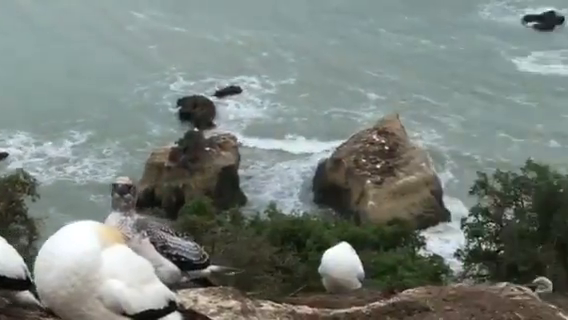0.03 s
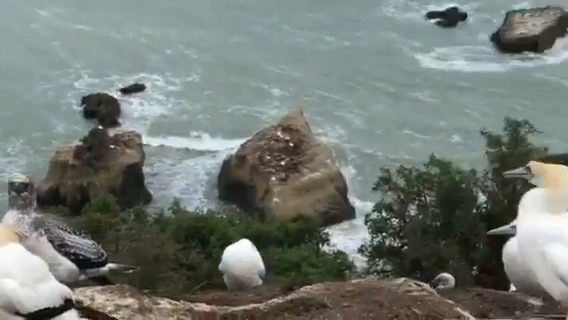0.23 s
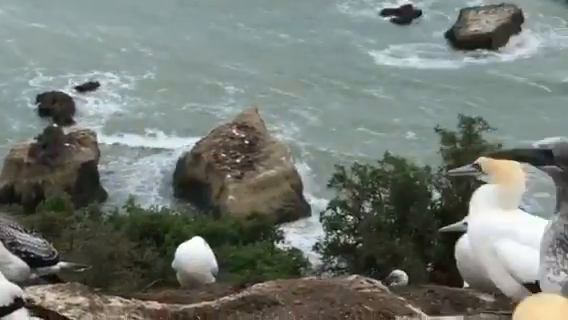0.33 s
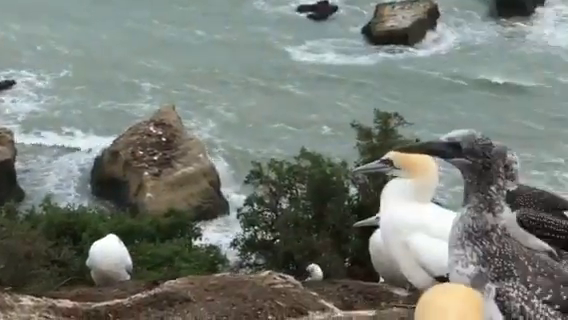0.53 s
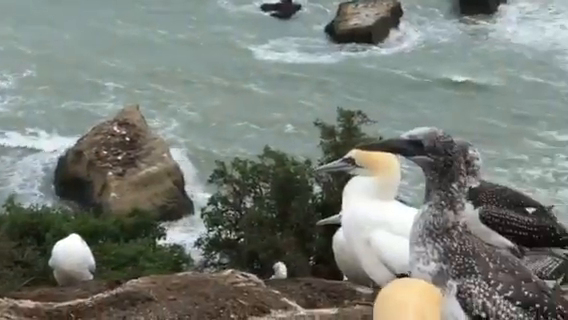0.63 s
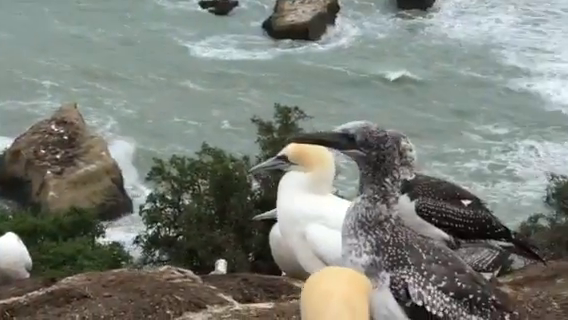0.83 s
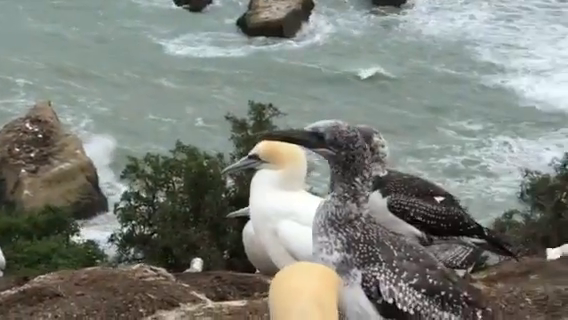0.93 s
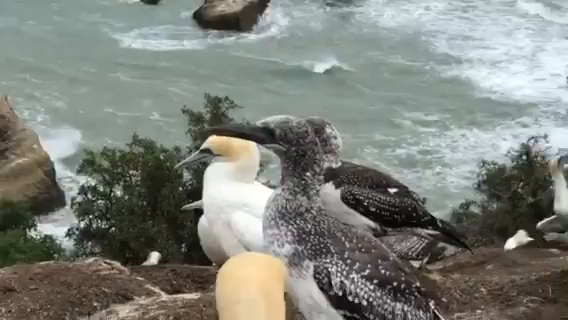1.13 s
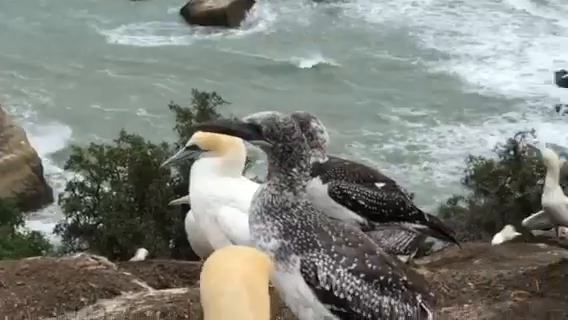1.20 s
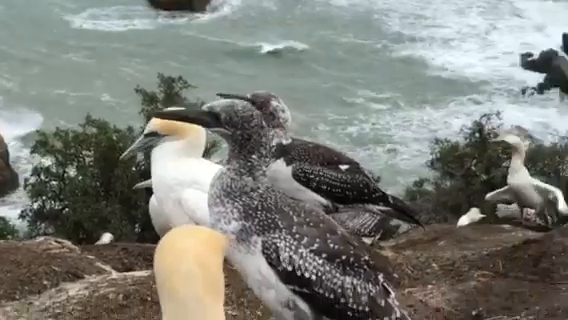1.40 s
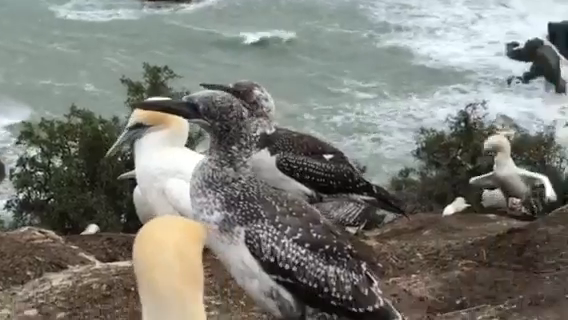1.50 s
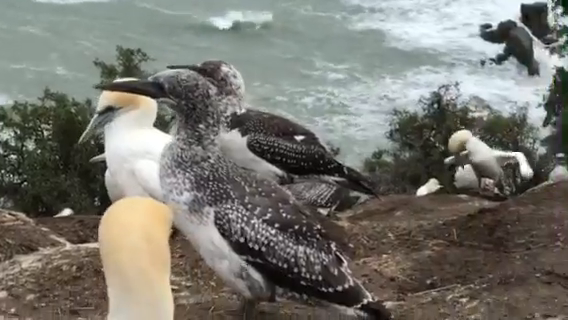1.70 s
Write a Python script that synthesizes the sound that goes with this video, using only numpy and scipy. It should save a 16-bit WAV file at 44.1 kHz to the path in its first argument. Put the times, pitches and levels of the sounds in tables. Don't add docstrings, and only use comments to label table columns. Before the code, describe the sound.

Seabirds cackle in quick rasping, ringing notes at the start, around 0.6 and again at 1.1 seconds. A chick's thin peeps repeat every 0.18 seconds, fainter near 0.9. A short deep call comes at 0.2, nasal honks at 0.45, 1.0, 1.3 and 1.6. Bills scrape and tick faintly. Wind rumbles and pops hard at 0.67 and 1.05-1.25, over steady distant surf and colony murmur.

```python
import sys
import numpy as np
from scipy import signal
from scipy.io import wavfile
from scipy.ndimage import uniform_filter1d

SR = 44100
rng = np.random.default_rng(int(sys.argv[2]) if len(sys.argv) > 2 else 0)


def int16_out(signal):
    q = np.round(np.clip(np.atleast_2d(signal).T, -1, 1) * 32767)
    wavfile.write(sys.argv[1], SR, q.astype(np.int16))


def volts_from_db(level):
    exponent = np.asarray(level, float) / 20
    return 10 ** exponent


N = 77175

# start t/s, top pitch f/Hz, level/dB
CHICK_PEEPS = [
    (.032, 2267, -44),
    (0.204, 2253, -43),
    (0.381, 2233, -45),
    (.563, 2235, -45.5),
    (.739, 2203, -48.5),
    (.920, 2206, -50.5),
    (1.096, 2216, -46.5),
    (1.276, 2216, -43.5),
    (1.455, 2244, -45.5),
    (1.641, 2240, -43.5),
]
PEEP_HARMONICS = [0, -17, -44, -46, -43, -42, -43]
# start t/s, length t/s, ring f/Hz, level/dB, octave level/dB
CACKLE_NOTES = [(.028, 0.022, 1925, -35.5, -21), (0.088, 0.026, 1875, -40.5, -14),
                (0.156, 0.032, 1815, -33.5, -20), (.563, 0.019, 1734, -36, -13.5),
                (0.636, 0.016, 1800, -46.5, 6), (.618, .02, 2200, -50, -12), (0.706, 0.024, 1785, -40, -5),
                (1.096, 0.023, 1940, -36.5, -17), (1.158, 0.032, 1890, -37.5, -19),
                (1.226, 0.028, 2000, -47, -14), (0.096, 0.0194, 1476, -41, -15),
                (0.4, 0.015, 1500, -42.5, -7), (.035, 0.0073, 1544, -37.5, -22),
                (1.575, 0.027, 1556, -37, -4.5), (1.592, 0.019, 2900, -48, -21),
                (0.381, 0.025, 1500, -49.5, -16), (1.279, 0.012, 1400, -43, -30)]
# start t/s, level/dB
CACKLE_RASPS = [(.003, -43), (0.067, -39), (0.138, -41), (0.538, -46), (0.607, -55), (.68, -52.5),
                (1.072, -44.5), (1.142, -45.5), (1.205, -48), (1, -50.5), (1.66, -42.5), (1.678, -48),
                (0.18, -51), (.03, -53), (0.33, -53.5), (.63, -53), (0.45, -52), (1.03, -54), (1.49, -50),
                (0.86, -55.5), (1.2, -52.5), (.21, -42), (.245, -47)]
# f/Hz, width f/Hz, level/dB
THROAT = [(1500, 450, 0), (2000, 500, -2), (3300, 900, -8), (4900, 1200, -17)]
# start t/s, length t/s, first pitch f/Hz, last pitch f/Hz, level/dB
NASAL_HONKS = [
    (0.450, 0.057, 969.6, 989, -39.5),
]
# f/Hz, level/dB
NASAL_BILL = [(950, -9), (1900, 2.5), (2900, -12), (3900, -1), (4900, -16), (9800, -23), (10800, -40),
              (12800, -27)]
# start t/s, length t/s, first pitch f/Hz, last pitch f/Hz, level/dB
DEEP_CALLS = [
    (0.201, 0.038, 478.8, 472.8, -32.5),
]
# f/Hz, level/dB
DEEP_COLOUR = [(950, -16.5), (1450, 1.5), (1900, -10), (2400, -20), (2900, -12.5), (4100, -29.5),
               (5500, -20.5), (12000, -56)]
# start t/s, length t/s, first pitch f/Hz, last pitch f/Hz, level/dB
NEIGHBOUR_HONKS = [
    (0.232, 0.0438, 926, 847, -43.5),
    (1.276, .060, 922, 843.6, -42),
]
# f/Hz, level/dB
NEIGHBOUR_BILL = [(880, -7), (1760, 2), (2650, -4), (3550, -5), (4400, -25), (5800, -13), (8800, -35),
                  (11500, -27)]
# start t/s, length t/s, first pitch f/Hz, last pitch f/Hz, level/dB
DISTANT_HONKS = [
    (0.745, .043, 1084, 1018, -46.5),
    (0.99, 0.056, 1021, 956, -45),
    (1.594, 0.026, 1070, 1010, -43.5),
    (1.66, 0.022, 1093, 1125, -50),
    (.886, 0.018, 844, 810, -55),
]
# f/Hz, level/dB
DISTANT_BILL = [(1000, -5), (2000, 0), (3000, -5), (4000, -8), (5000, -26), (6200, -19), (8500, -22),
                (13000, -38)]
# start t/s, length t/s, level/dB
BILL_SCRAPES = [(.008, 0.024, -66), (.03, .025, -58), (0.071, 0.023, -54.5), (0.091, 0.024, -52),
                (0.137, 0.017, -59), (.158, 0.032, -59), (0.21, 0.031, -52), (0.263, 0.015, -58),
                (0.419, 0.014, -60), (0.492, 0.02, -56), (0.54, 0.02, -58.5), (0.599, 0.049, -65),
                (.955, .016, -63), (1.125, .02, -63), (1.675, 0.01, -67), (1.49, 0.014, -67),
                (1.582, .02, -62)]
# f/Hz, width f/Hz, level/dB
SCRAPE_HISS = [(5050, 2000, 0), (6570, 1800, -2), (8300, 1600, -10.5), (12500, 3000, -23)]
# middle t/s, level/dB
BILL_TICKS = [(0.0781, -55), (.2191, -60), (0.4251, -70), (0.5211, -70), (0.6361, -65), (.7381, -71),
              (.5051, -68), (.2851, -73), (.2951, -73), (1.2111, -73), (1.1401, -73), (1.2501, -75),
              (.2321, -66), (.1081, -68), (1.537, -75), (1.67, -70)]
# t/s, level/dB
GUST_STRENGTH = [(0, -38), (.17, -36), (.25, -28.5), (.36, -27.5), (.62, -24.5), (0.691, -29.5),
                 (0.792, -33), (0.881, -28.5), (0.941, -32.5), (1.06, -23), (1.11, -25), (1.219, -22.5),
                 (1.29, -37), (1.37, -27.5), (1.54, -34), (1.6, -36.5), (1.75, -37)]
# f/Hz, level/dB
WIND_RUMBLE = [(25, -22), (40, -4), (58, 8), (100, -6), (170, -7), (300, -22.5), (600, -32), (1500, -78.5)]
# start t/s, peak level/dB, upper edge f/Hz, length t/s
WIND_BUFFETS = [(.197, -31, 220, 0.025), (.282, -25, 186, 0.01), (.434, -26, 199, 0.036),
                (0.514, -23, 420, 0.033), (.56, -27.5, 300, .03), (.628, -24.5, 325, .035),
                (.75, -31, 200, 0.031), (1.23, -23, 200, 0.013), (1.01, -27, 301, .02),
                (.355, -27, 181, 0.019), (.602, -22.5, 253, .02), (.662, -15, 300, 0.028),
                (0.689, -14.5, 330, 0.018), (0.712, -20, 374, .02), (.808, -26.5, 297, 0.016),
                (1.051, -11, 248, 0.019), (1.063, -18.5, 178, 0.02), (1.122, -20, 200, 0.01),
                (1.199, -17, 375, 0.014), (1.219, -18, 328, 0.02), (1.351, -18.5, 281, 0.037),
                (1.394, -19.5, 386, 0.015), (1.51, -21.5, 189, 0.024)]
# middle t/s, peak level/dB, centre f/Hz
WIND_POPS = [(.6717, -3, 150), (.679, -13.5, 172), (.686, -12.5, 98), (.695, -18.5, 890), (1.016, -19, 220),
             (1.187, -18, 553), (1.224, -23, 554), (1.475, -22.5, 250), (.886, -19, 170), (1.55, -23.5, 57),
             (.705, -15.5, 120), (.862, -22, 55), (.9, -21, 50), (.7, -15, 45), (.34, -24, 55),
             (.755, -26, 60), (1.11, -21, 60), (1.44, -27, 65), (.97, -26, 55), (.5, -26, 90),
             (1.7, -32, 55), (1.238, -15, 140), (1.398, -24, 500), (.522, -22, 450), (.365, -23, 110)]
# t/s, level/dB
SURF_SWELL = [(0, 5), (.3, 2), (.6, 5), (.8, 2), (1.1, 4), (1.4, 3), (1.75, 6.5)]
# f/Hz, level/dB
SURF_COLOUR = [(220, -5.5), (600, -14), (1200, -16), (2000, -20.5), (3800, -26.5), (7500, -41),
               (10500, -54), (15500, -59.5)]

EDGE_S = 0.00589


def peep(start, top_hz, db):
    length_s, top_at = 0.047, 0.38
    u, env = shape(length_s)
    rising = 0.035 * (1 - u / top_at) ** 2
    falling = 0.095 * ((u - top_at) / (1 - top_at)) ** 2
    bend = np.where(u < top_at, rising, falling)
    blip_u, blip_env = shape(0.011)
    blip_wobble, wobble = uniform_filter1d(rng.standard_normal((2, 4000)), size=150, axis=1)
    blip_pitch = 1638 * (1 + 0.0078 * evened(blip_wobble)[:len(blip_u)])
    blip = volts_from_db(db - 2) * blip_env * stack(blip_pitch, [2.5, 0.5])
    dulling = 4 * np.c_[:len(PEEP_HARMONICS)] * (u ** 2 - 0.2)
    pitch = top_hz * (1 - bend + 0.003 * evened(wobble)[:len(u)])
    whistle = volts_from_db(db) * env * stack(pitch, np.c_[PEEP_HARMONICS] - dulling)
    return [(start, whistle), (start + length_s - 0.002, blip)]


def note(start, length, hz, db, octave_db):
    u, env = shape(length)
    wobble = evened(smooth_twice(rng.standard_normal(4000), 90, 60))[:len(u)]
    pitch = hz * (1 + 0.035 * (0.5 - u) + 0.012 * wobble)
    ring = stack(pitch, [0, octave_db - 30 * (u - 0.65) ** 2])
    return start, volts_from_db(db) * env * np.sin(np.pi * u) * ring


def rasp(throat, start, length, db):
    pulse_hz, roughness = 430, 0.7
    u, env = shape(length)
    drift, breath = rng.standard_normal((2, 4000))[:, :len(u)]
    turns = np.cumsum(pulse_hz * (1 + 2 * uniform_filter1d(drift, size=100))) / SR
    gate = np.exp(-(turns % 1) / 0.15)
    pulses = evened(np.diff(gate, prepend=1))
    puffs = evened((gate + 0.3) * breath)
    drive = (1 - roughness) * pulses + roughness * puffs
    drive = signal.sosfilt(signal.butter(2, 9000, fs=SR, output="sos"), drive)
    voice = 0
    for hz, width, gain_db in throat:
        voice = voice + volts_from_db(gain_db) * resonate(resonate(drive, hz, width), hz, width)
    unsteady_db = 3.0 * evened(smooth_twice(drift[::-1], 120, 50))
    return start, volts_from_db(db) * env * evened(voice * volts_from_db(unsteady_db))


def honk(bill, start, length, first_hz, last_hz, db):
    u, env = shape(length)
    mean_hz = (first_hz + last_hz) / 2
    hz = mean_hz * np.arange(1, int(31000 / (first_hz + last_hz)) + 1)
    faintness_db = max(-39.5 - db, 0)
    distance = 0.3 * (hz == hz[0]) - 0.3556 * (hz / 1000 - 2)
    levels = read(bill, hz) + distance * faintness_db
    levels = levels - 6 * np.maximum(hz - 13200, 0) / 1000
    peak_at = 0.62 if last_hz > first_hz else 0.48
    swell = -13 * np.maximum(hz / 1000 - 2, 0)[:, None] * (u - peak_at) ** 2
    chance = smooth_twice(rng.standard_normal((40, 4000)), 300, 100)
    flutter = 3.2 * evened(chance)[:len(hz), 500:500 + len(u)] * (hz[:, None] > 2200)
    glide = first_hz + (last_hz - first_hz) * u
    pitch = glide * (1 + 0.0015 * evened(chance[-1])[:len(u)])
    air = evened(smooth_twice(rng.standard_normal(4000), 120, 120))[:len(u)]
    hoarse = 1 + volts_from_db(-17) * air
    return start, volts_from_db(db) * env * hoarse * stack(pitch, levels[:, None] + swell + flutter)


def birds():
    calls = []
    for row in CHICK_PEEPS:
        calls += peep(*row)
    calls += [note(*row) for row in CACKLE_NOTES]
    calls += [rasp(THROAT, start, 0.025, db) for start, db in CACKLE_RASPS]
    for bill, honks in [(NASAL_BILL, NASAL_HONKS), (DEEP_COLOUR, DEEP_CALLS),
                        (NEIGHBOUR_BILL, NEIGHBOUR_HONKS), (DISTANT_BILL, DISTANT_HONKS)]:
        calls += [honk(bill, *row) for row in honks]
    calls += [rasp(SCRAPE_HISS, *row) for row in BILL_SCRAPES]
    mix = np.zeros(N)
    for start, sound in calls:
        add(mix, start, sound)
    echo_db, echo_s = -17.5, 0.24
    t = np.arange(SR // 4) / SR
    tail = rng.standard_normal(len(t)) * volts_from_db(-60 * t / echo_s) * (t > 0.004)
    return mix + volts_from_db(echo_db) * signal.fftconvolve(mix, tail / np.linalg.norm(tail))[:N]


def ticks():
    mix, t = np.zeros(N), np.arange(260) / SR
    env = np.sin(np.pi * t / t[-1]) ** 2
    for moment, db in BILL_TICKS:
        bright = np.diff(rng.standard_normal(len(t) + 1))
        add(mix, moment - t[-1] / 2, volts_from_db(db) * env * evened(bright))
    return mix


def wind():
    lumps = evened(uniform_filter1d(rng.standard_normal(N // 256 + 5), size=4))
    gust_db = np.interp(np.arange(N) / SR, *np.transpose(GUST_STRENGTH)) + 0.5
    mix = noise(WIND_RUMBLE, 1024, 3.0 * lumps[None]) * volts_from_db(gust_db)
    for moment, db, edge_hz, length in WIND_BUFFETS:
        band = signal.butter(2, [0.3 * edge_hz, edge_hz], "bandpass", fs=SR, output="sos")
        push = signal.sosfilt(band, rng.standard_normal(6000))
        push = signal.sosfilt(signal.butter(1, edge_hz, fs=SR, output="sos"), push)
        push = push[2000:]
        env = shape(length + EDGE_S)[1]
        add(mix, moment - EDGE_S / 2, volts_from_db(db - 7) * env * evened(push[:len(env)]))
    return mix


def pops():
    mix = np.zeros(N)
    for moment, db, hz in WIND_POPS:
        u = (np.arange(N) / SR - moment) * np.sqrt(2) * np.pi * hz
        mix -= volts_from_db(db) * (1 - u ** 2) * np.exp(-u ** 2 / 2)
    return mix


def surf():
    frames = N // 128 + 5
    patches = uniform_filter1d(rng.standard_normal((frames, 257)).T, size=5, axis=0)
    patches = evened(uniform_filter1d(patches, size=10, axis=1))
    flicker = evened(uniform_filter1d(rng.standard_normal(frames), size=4))
    wash = noise(SURF_COLOUR, 512, 1.6 * patches + 0.8 * flicker)
    swell_db = np.interp(np.arange(N) / SR, *np.transpose(SURF_SWELL))
    return wash * volts_from_db(-49.5 + 1.5 + swell_db)


def evened(x):
    return x / np.sqrt(np.mean(x ** 2) + 1e-20)


def smooth_twice(x, first, second):
    return uniform_filter1d(uniform_filter1d(x, size=first), size=second)


def read(points, hz):
    f, value = np.transpose(points)
    return np.interp(np.log(hz + 1), np.log(f + 1), value)


def add(mix, start, sound):
    part = mix[round(start * SR):][:len(sound)]
    part += sound[:len(part)]


def resonate(x, hz, width):
    turn = np.exp(2j * np.pi * hz * np.arange(len(x)) / SR)
    r = np.exp(-np.pi * abs(width) / SR)
    return 2 * (turn * signal.lfilter([1 - r], [1, -r], x / turn)).real


def shape(length):
    t = np.arange(0, length, 1 / SR)
    edge = np.clip(np.minimum(t, length - t) / min(EDGE_S, length / 2), 0, 1)
    return t / length, np.sin(np.pi / 2 * edge) ** 2


def stack(hz, levels_db):
    turns = np.cumsum(hz) / SR
    total = 0
    for k, db in enumerate(levels_db):
        total = total + np.sqrt(2) * volts_from_db(db) * np.sin(2 * np.pi * (k + 1) * turns + k * k)
    return total


def noise(colour, size, field_db):
    hz = np.fft.rfftfreq(size, 1 / SR)
    real, imag = rng.standard_normal((field_db.shape[1], len(hz), 2)).T
    spectra = (real + 1j * imag) * volts_from_db(read(colour, hz)[:, None] + field_db)
    return evened(signal.istft(spectra, nperseg=size, noverlap=3 * size // 4)[1][:N])


def scene():
    return (birds() + ticks() + wind() + pops() + surf())[None]


def top_cut(x):
    return signal.sosfilt(signal.butter(12, 15740, fs=SR, output="sos"), x)


def record(dry):
    bass_cut = signal.butter(3, 42, "highpass", fs=SR, output="sos")
    return top_cut(signal.sosfilt(bass_cut, dry))


dry = scene()
out = record(dry)
int16_out(out)
```